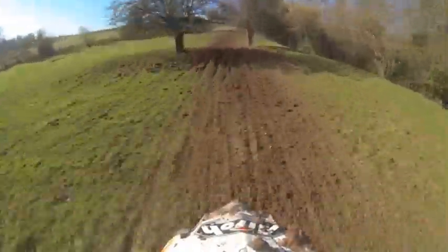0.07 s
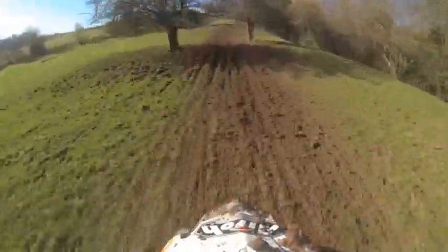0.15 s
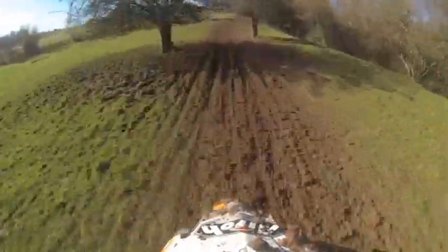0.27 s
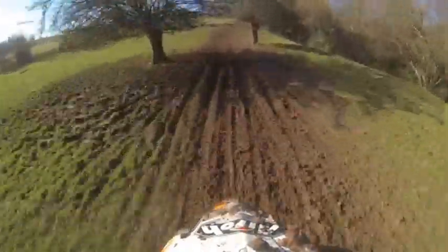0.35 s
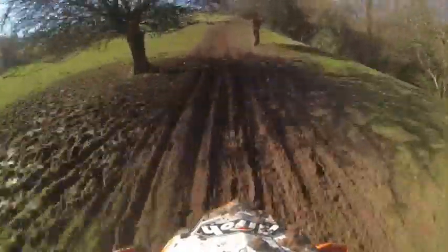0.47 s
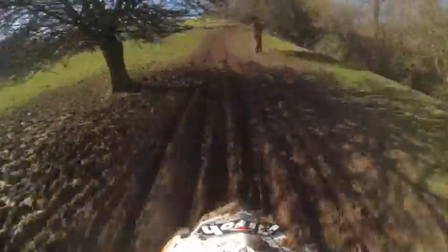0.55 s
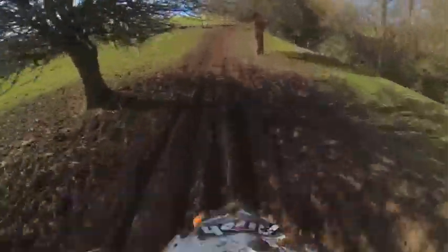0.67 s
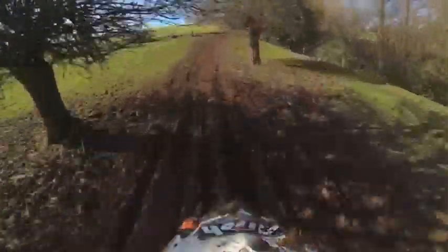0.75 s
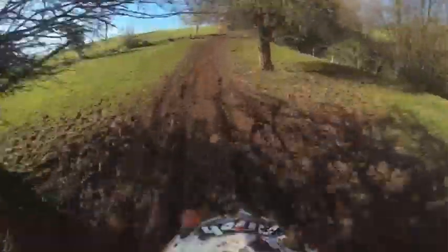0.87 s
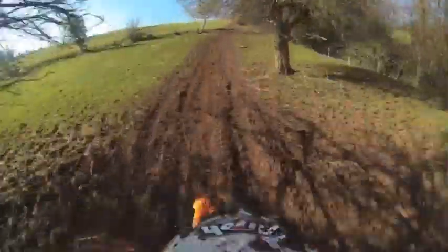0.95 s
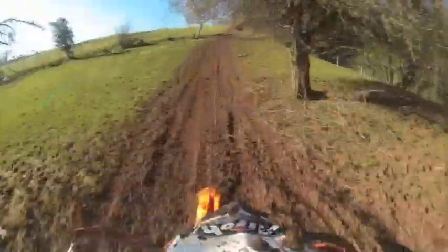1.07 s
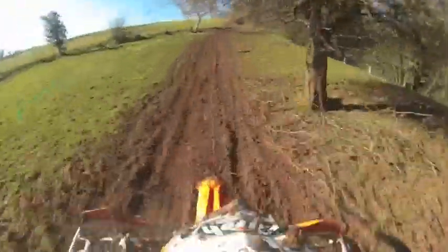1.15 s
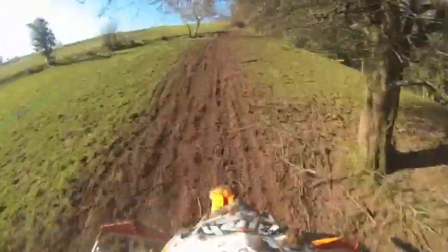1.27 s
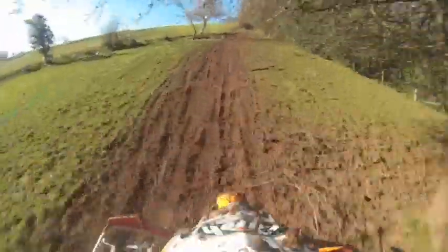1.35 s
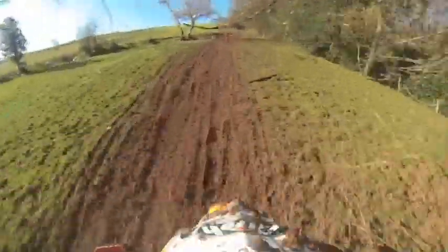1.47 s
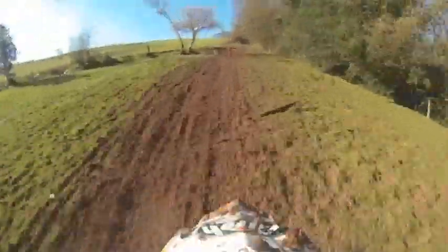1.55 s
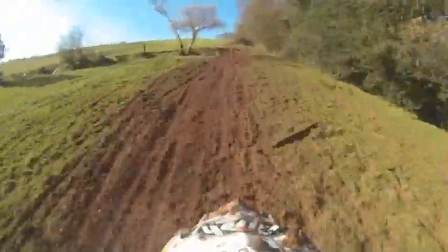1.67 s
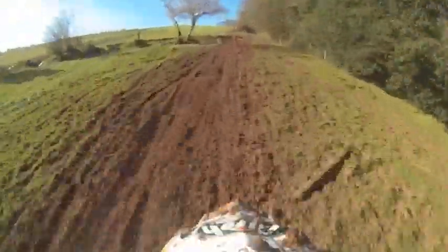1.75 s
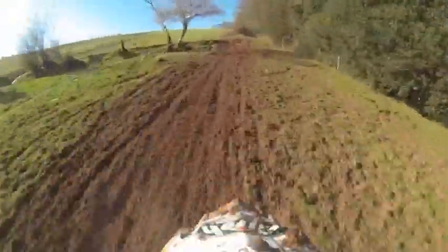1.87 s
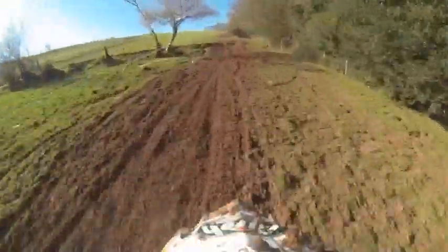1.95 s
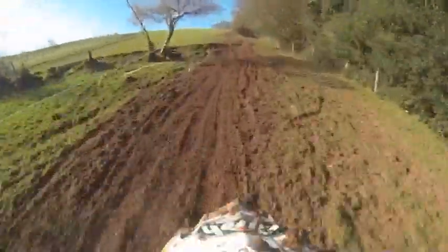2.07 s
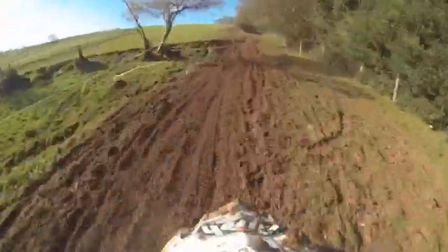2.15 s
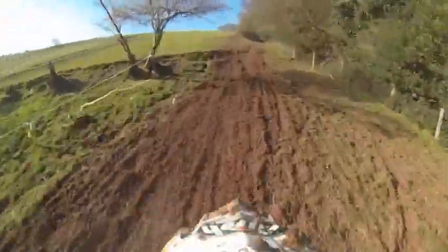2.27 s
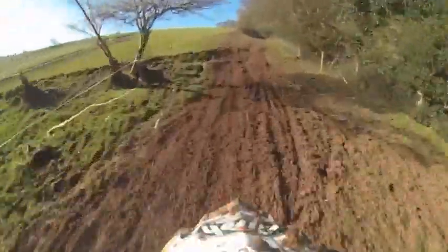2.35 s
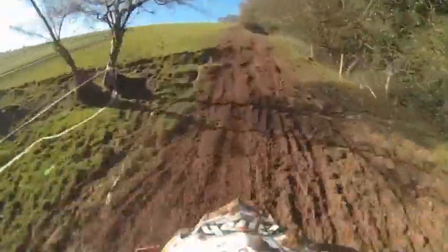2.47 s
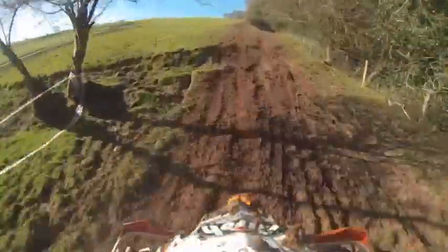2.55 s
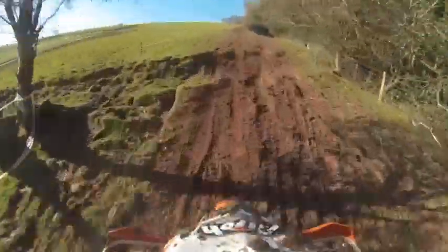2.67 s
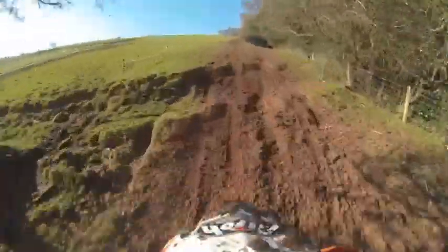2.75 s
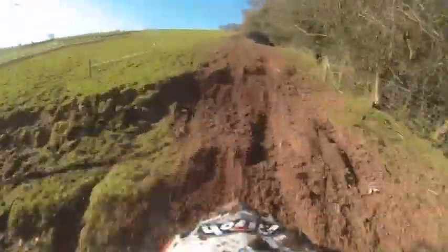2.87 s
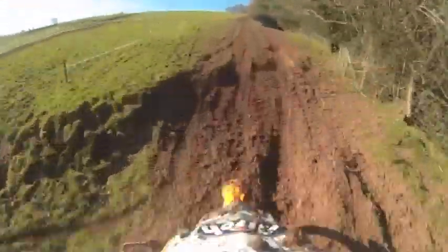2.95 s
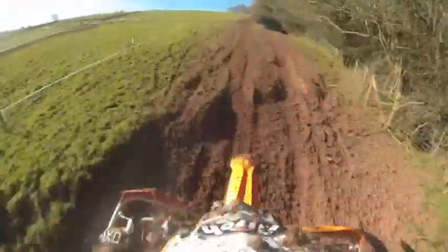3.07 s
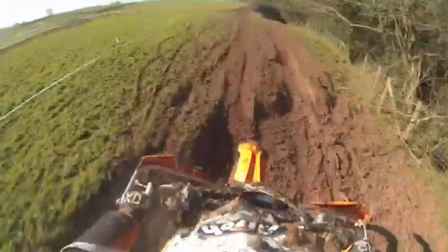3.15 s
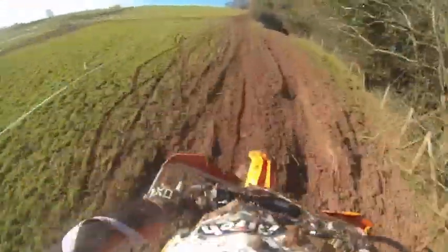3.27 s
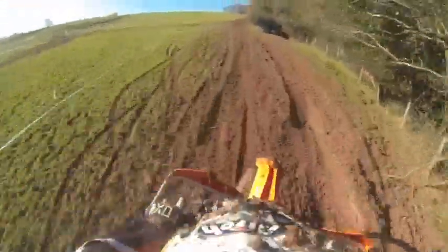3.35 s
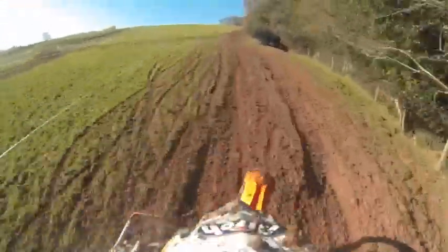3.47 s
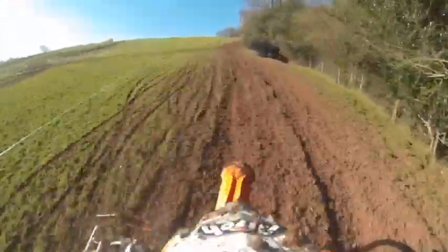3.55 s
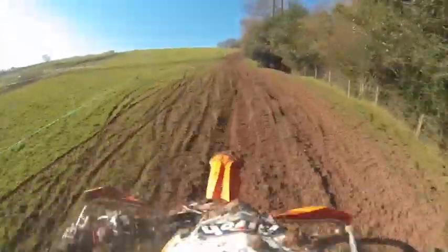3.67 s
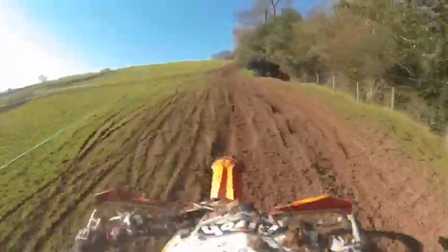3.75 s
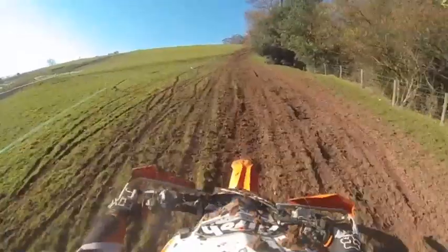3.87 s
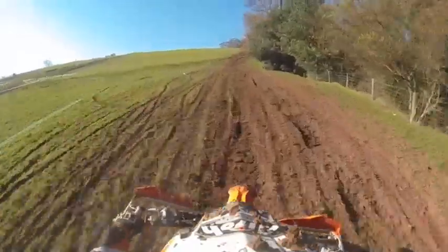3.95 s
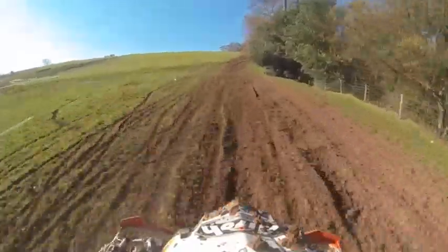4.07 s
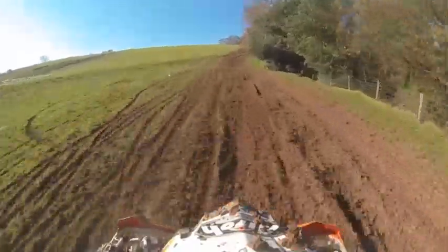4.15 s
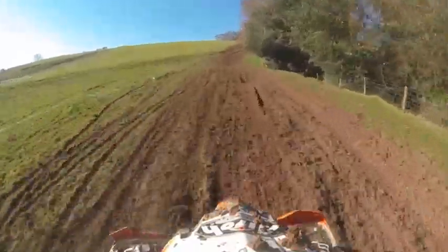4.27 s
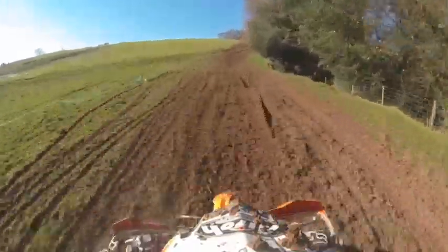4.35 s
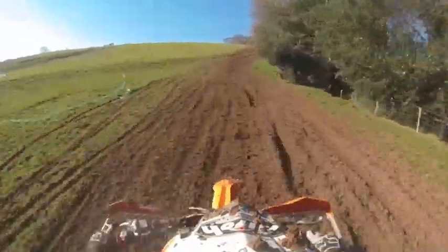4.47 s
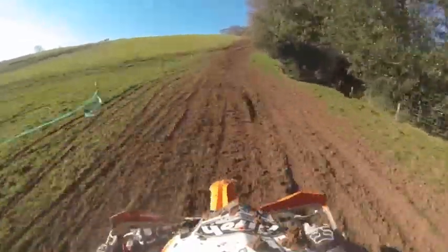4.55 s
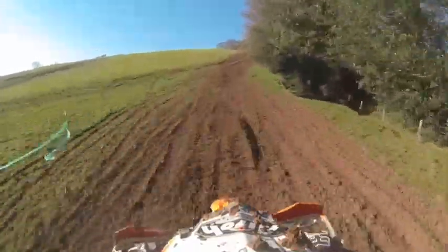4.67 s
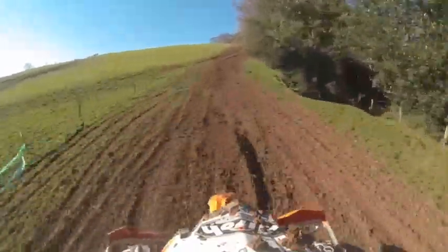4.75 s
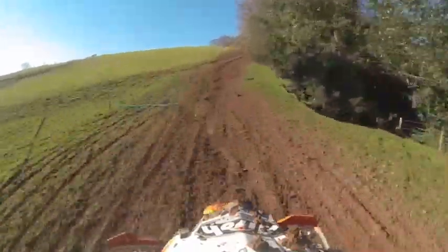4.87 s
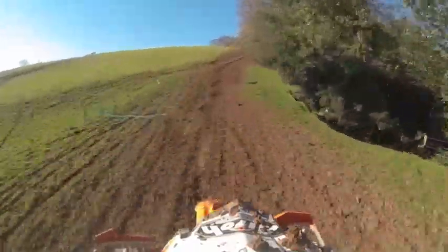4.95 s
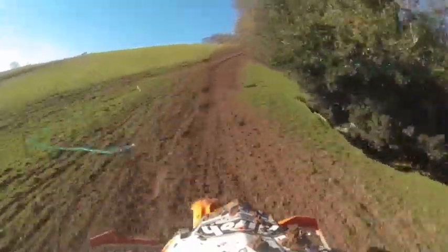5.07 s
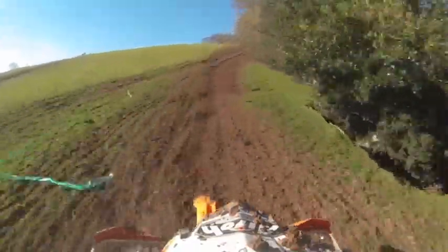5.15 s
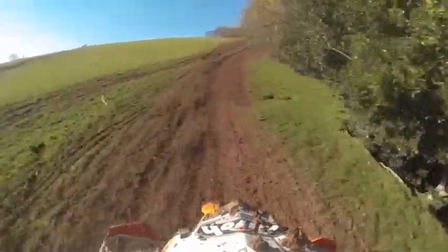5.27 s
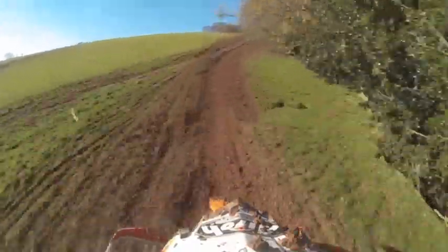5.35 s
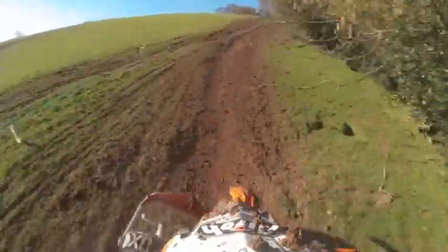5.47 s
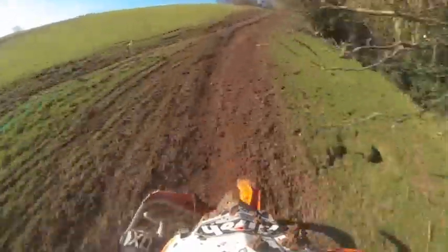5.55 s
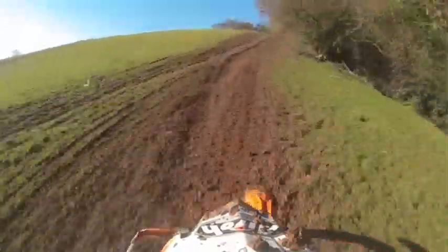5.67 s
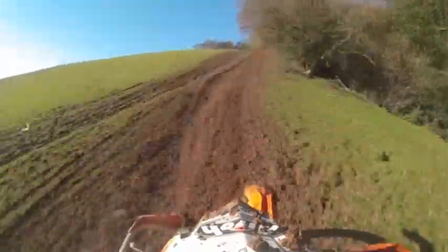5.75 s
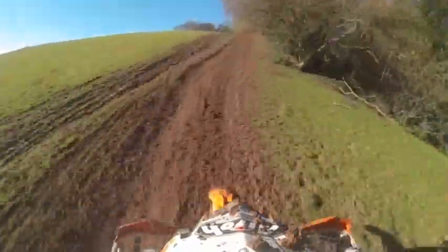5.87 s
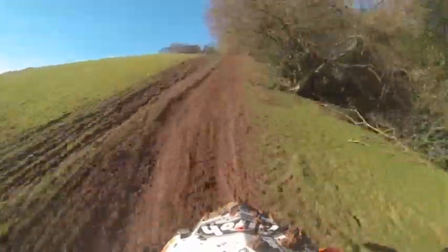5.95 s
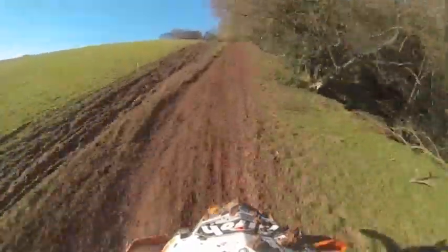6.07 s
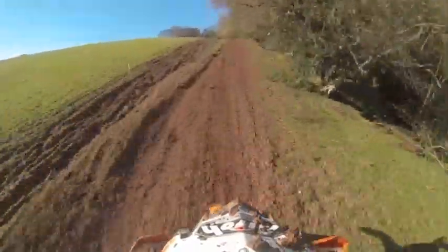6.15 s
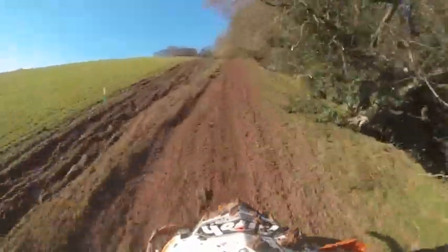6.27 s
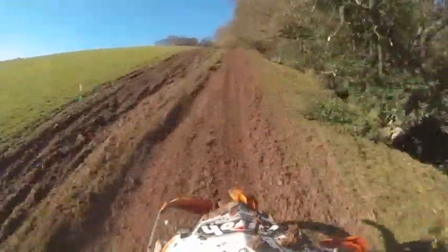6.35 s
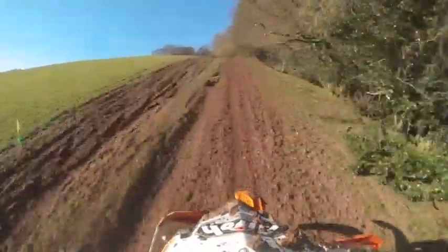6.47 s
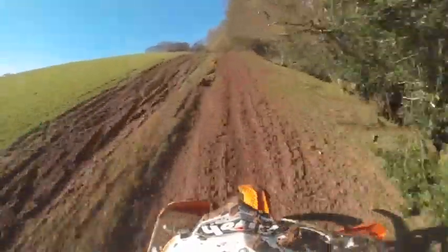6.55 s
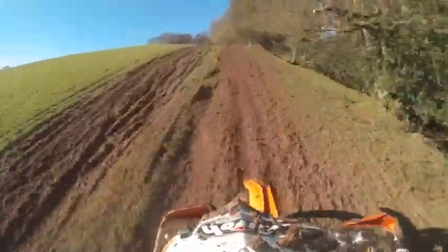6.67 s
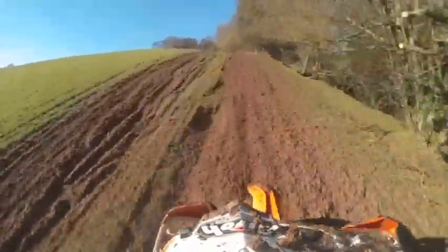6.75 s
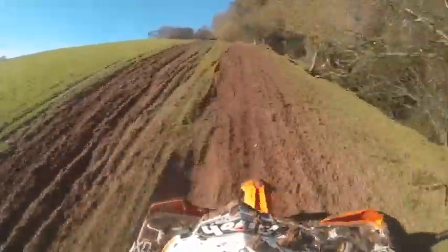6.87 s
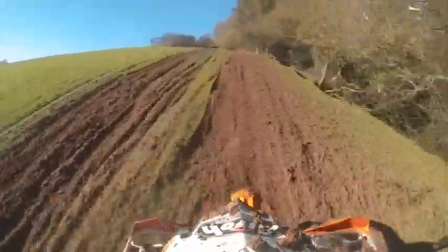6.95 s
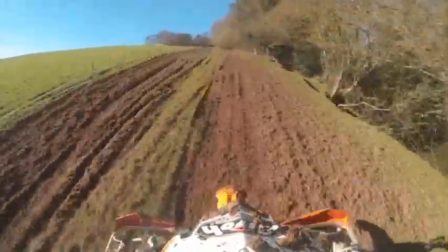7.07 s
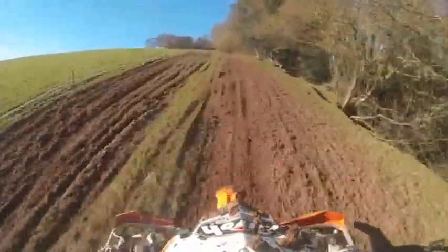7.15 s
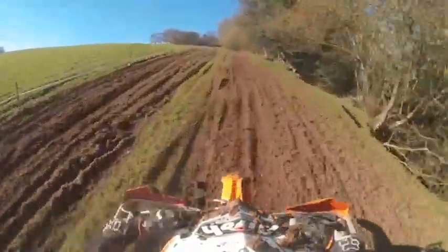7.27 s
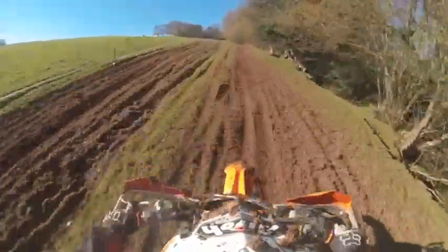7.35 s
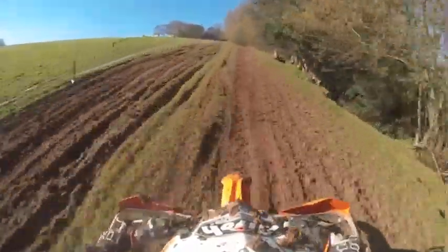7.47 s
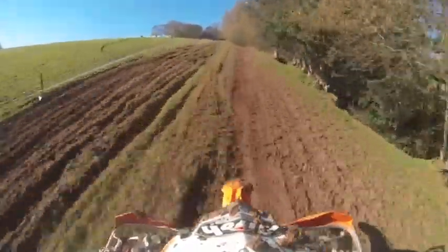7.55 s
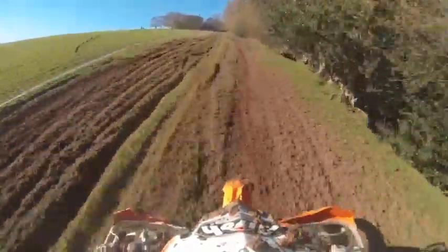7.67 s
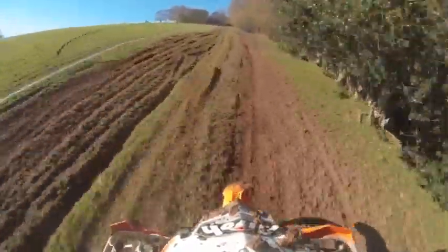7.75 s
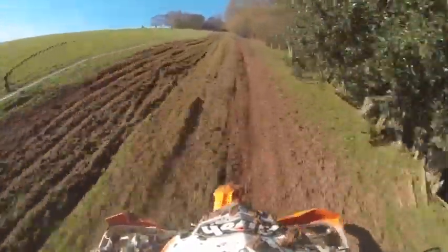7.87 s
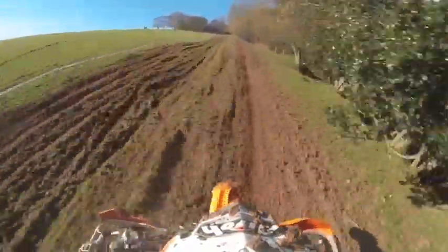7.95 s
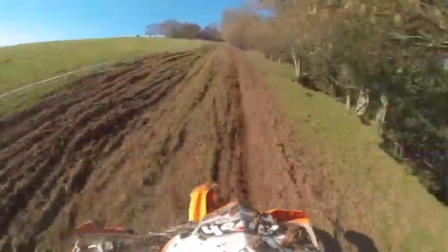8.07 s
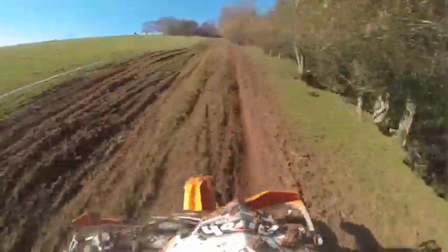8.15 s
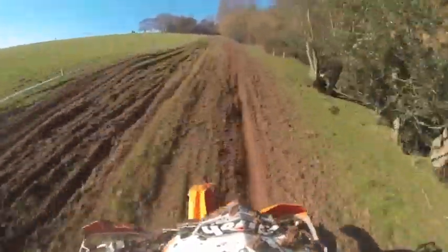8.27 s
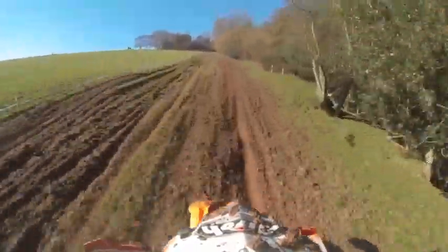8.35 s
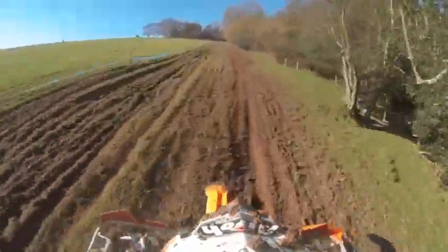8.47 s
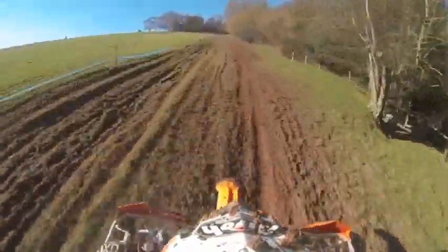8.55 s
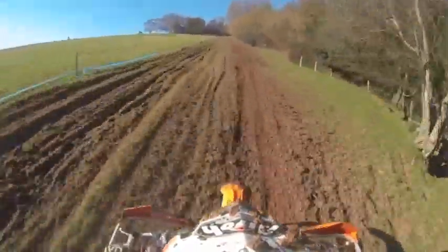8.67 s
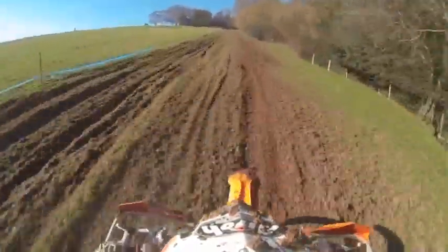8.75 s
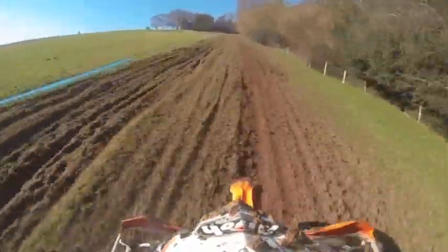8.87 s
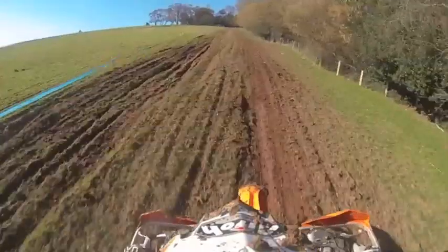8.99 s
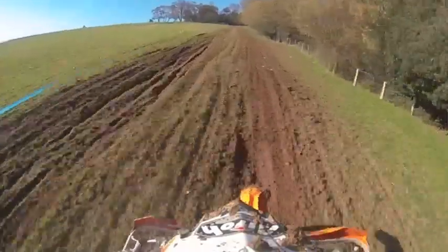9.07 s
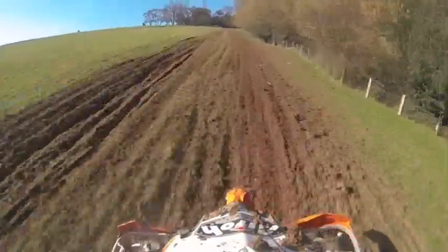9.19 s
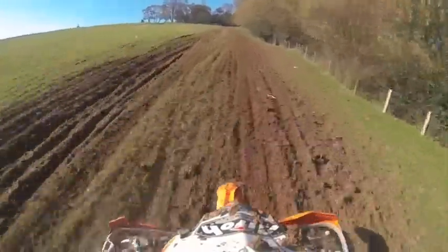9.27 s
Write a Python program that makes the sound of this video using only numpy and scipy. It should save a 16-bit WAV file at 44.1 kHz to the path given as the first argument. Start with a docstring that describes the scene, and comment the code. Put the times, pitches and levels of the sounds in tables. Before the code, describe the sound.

A single-cylinder four-stroke dirt bike is heard up close from the rider, outdoors on rough ground, with a low pulsing boom, a sharp bark and a gassy rasp. It starts on part throttle and opens up at about 0.6 seconds, the revs flaring as the wheel slips. At 1.55 seconds a sharp click on the microphone briefly ducks everything. The throttle shuts at about 2.1 and again at 2.5 seconds, exposing engine and chain clatter. The revs then shoot up at 2.9 seconds and higher still around 3.4, settling by 4. From there the engine pulls hard to the end at about 9.3 seconds, its pitch wavering with many quick flares. A lighter click comes at 5.7 seconds during a stronger surge. Low wind rumble runs throughout, with short buffets from bumps, strongest around 3.1 and 4.5 to 4.7 seconds.

```python
"""Single-cylinder four-stroke dirt bike ridden hard up a rutted field, heard from a camera on the rider.
Each firing drives a low pulse through the pipe, a sharp mid-band bark and a rasp of gas.
Wheel slip flares the revs; off the throttle the bark gives way to engine and chain clatter.
Wind and bumps rumble on the microphone. Two hard clicks on the camera duck its limiter."""
import sys
import numpy as np
from scipy import signal
from scipy.fft import rfft, irfft
from scipy.io import wavfile
from scipy.ndimage import uniform_filter1d, minimum_filter1d

SR = 44100
rng = np.random.default_rng(int(sys.argv[2]) if len(sys.argv) > 2 else 0)


def dump(signal):
    """Clip the signal to [-1, 1] and save it as 16-bit WAV at the path in sys.argv[1]."""
    limited = np.clip(np.atleast_2d(signal).T, -1, 1)
    pcm = np.round(limited * 32767).astype(np.int16)
    wavfile.write(sys.argv[1], SR, pcm)


N = 411012
T = np.arange(N) / SR
BIN_HZ = np.fft.rfftfreq(N, 1 / SR)

# firing rate with the rear wheel gripping (time [s], rate [Hz])
GRIP_RATE_HZ = [(0, 57), (0.477, 58.4), (0.57, 67), (1.027, 66.3), (2.038, 65.097), (2.22, 57.7),
                (2.595, 54.3), (2.769, 60.6), (3.123, 59.4), (3.755, 75.7), (4.038, 64.4), (4.397, 58.928),
                (5.792, 64.7), (6.569, 65.6), (6.928, 69.5), (7.493, 70.4), (9.32, 75)]
# rev flares from wheel slip (peak time [s], extra rate [Hz], length [s])
SLIP_FLARES = [(0.781, 7.214, 0.17), (1.088, 3.318, 0.161), (1.275, 12.665, 0.17), (1.496, 10.812, 0.472),
               (1.922, 7.103, 0.1), (2.086, 8.983, 0.132), (2.382, 4.661, 0.305), (2.862, 26.6, 0.39),
               (3.405, 41.4, 0.46), (3.586, 29.0, 0.3), (3.823, 3.211, 0.412), (4.332, 7.839, 0.113),
               (4.447, 9.736, 0.099), (4.583, 6.333, 0.113), (4.745, 8.231, 0.118), (4.92, 9.251, 0.126),
               (5.139, 7.614, 0.081), (5.382, 5.051, 0.299), (5.549, 17.224, 0.135), (5.696, 17.781, 0.259),
               (6.004, 9.99, 0.183), (6.206, 12.928, 0.289), (6.458, 1.71, 0.2464), (6.838, 3.31, 0.0816),
               (7.007, 3.286, 0.2), (7.177, 2.925, 0.1291), (7.601, 9.279, 0.097), (7.762, 14.398, 0.152),
               (7.977, 11.416, 0.107), (8.104, 12.929, 0.118), (8.244, 10.184, 0.114),
               (8.392, 8.579, 0.356), (8.593, 11.937, 0.111), (8.722, 11.97, 0.129), (8.912, 4.48, 0.086),
               (9.091, 11.111, 0.16), (9.261, 15.16, 0.223)]
# throttle (time [s], opening [0-1])
THROTTLE_OPENING = [(.15, 0.2), (.3, 0.42), (.53, 0.5), (.63, 0.84), (2.07, 0.91), (2.12, 0), (2.33, .48),
                    (2.44, 0.3), (2.55, 0), (2.68, 0.68), (2.87, 0.98), (3.08, 0.59), (3.22, 0.8),
                    (4.1, 0.84), (4.3, .6), (4.5, 0.77), (5.2, 0.79), (5.6, 0.99), (7, 0.97), (8.4, 0.81),
                    (9.32, 0.93)]
# pipe and silencer response (frequency [Hz], gain [dB])
PIPE_DB = [(45, -36), (68, -25), (105, -34), (135, -16.5), (185, -9), (220, -1), (268, 10), (315, -2),
           (372, -16), (412, -18.5), (445, -11), (478, -11.5), (530, -12), (578, -23.5), (625, -15.5),
           (690, -27), (760, -24.5), (900, -30.5), (1050, -28), (1400, -51.5), (4000, -100)]
# main pipe resonance (time [s], sharpness [0-1])
PIPE_SHARPNESS = [(0, .2), (.5, 0), (.65, 0.4), (1.5, 0.3), (1.8, 0.7), (2.08, 0.5), (2.2, 0.85), (2.7, 0),
                  (2.86, 0.59), (3.05, 0.2), (3.6, .12), (3.85, .95), (5.3, 0.96), (6.5, 0.6), (7.4, .95),
                  (9.3, 1)]
# firing crack spectrum (frequency [Hz], gain [dB])
CRACK_DB = [(300, -56.5), (900, -35.5), (1150, -12), (1340, -12), (1480, 6.5), (1680, 3.5), (1870, 2),
            (2080, -12), (2300, -30.5), (2850, -26), (3250, -24.5), (3800, -34), (4500, -51), (9000, -100)]
# hollow band rung by the gas rush (frequency [Hz], gain [dB])
RUSH_DB = [(300, -46.5), (600, -24), (880, -25), (1100, -17.5), (1300, -8), (1500, -1.5), (1650, 3.5),
           (1870, -5.5), (2080, -15), (2500, -29.5), (4000, -77), (8000, -100)]
# slow swell of the bark (time [s], gain [dB])
BARK_SWELL_DB = [(0, 3.5), (.3, 1.5), (.65, 5.5), (.93, -0.5), (1.2, 1.5), (1.52, 3.5), (2.2, 0),
                 (2.55, 1.5), (2.77, 2.5), (3.1, 0.5), (3.55, 0), (3.7, 2), (4.2, 2), (4.7, -.5),
                 (5.1, 0.5), (5.45, -2), (6.5, -2.5), (7, 0.5), (7.4, -1), (8, 1.5), (8.55, -2.5), (9.1, 1)]
# engine case and chain spectrum (frequency [Hz], gain [dB])
CLATTER_DB = [(120, -27.5), (250, -15.5), (430, -11), (600, -19.5), (800, -19.5), (1050, -14), (1280, -3),
              (1520, 2), (1750, -3), (2050, -16), (2600, -17.5), (4000, -68.5), (8000, -100)]
# gas flow spectrum (frequency [Hz], gain [dB])
RASP_DB = [(1200, -22.5), (2150, -1), (2650, 0.5), (2900, -2), (3250, 1), (3600, -3.5), (3950, -5),
           (4450, -15), (5000, -19), (5600, -25), (6400, -33), (7100, -36.5), (8500, -43.5), (10500, -52.5),
           (15000, -75.5)]
# running gear resonances (centre [Hz], width [Hz], relative level [dB])
GEAR_RINGS = [(4980, 460, -15), (6480, 300, -27), (12900, 110, -40)]
# rumble on the microphone (time [s], wind [dB], ground [dB])
RUMBLE_DB = [(0, -29, -27.5), (.55, -36, -23), (.75, -34, -34.5), (1.5, -29.5, -31.5), (2.2, -26.5, -29),
             (3.1, -25.5, -31.5), (3.4, -34, -31), (4.1, -31, -42), (4.6, -36.5, -31), (5.6, -27, -34),
             (6.7, -36, -33), (8, -35, -37.5), (9.3, -39.5, -36)]
# air buffets at bumps (time [s], peak [dB])
BUMP_BUFFETS = [(3.06, -17), (3.113, -13), (3.719, -14), (4.45, -17), (4.515, -9), (4.668, -10),
                (4.846, -16), (5.225, -16.5), (6.335, -16), (6.759, -18.5), (7.45, -23), (7.725, -18),
                (7.942, -23), (8.079, -21), (8.195, -15), (8.689, -17.5), (8.85, -17)]
# knocks on the camera, pre-limiter (time [s], buzz [dB], length [s], nominal ring [Hz], thump [dB])
CAMERA_CLICKS = [(1.551, 34, 0.00957, 3141, 25.5), (5.705, 10.5, 0.0046, 2150, 0.5)]

# voice levels (wide open [dB], loss when shut [dB], gain in a full flare [dB])
BOOM_LAW_DB, GROWL_LAW_DB = (-16.5, 27.2, 2.7), (-33.5, 12, 4.8)
BARK_LAW_DB, RASP_LAW_DB = (-18, 8.25, 0.49), (-29.5, 6.8, .2)


def engine(full_flare_hz=17, bark_lag_s=0.001018, rasp_lag_s=0.00061):
    """Throttle and wheel slip drive all engine voices from one firing rate."""
    throttle, flare_hz = curves(THROTTLE_OPENING)[0], wheel_slip()
    rate_hz = curves(GRIP_RATE_HZ)[0] + flare_hz
    damping = 1 - np.clip(curves(PIPE_SHARPNESS)[0], 0, 1)
    load = engine_load(throttle, rate_hz, damping)
    boom_db, growl_db, bark_db, rasp_db = (
        open_db - shut_db * (1 - throttle) + slip_db * np.tanh(flare_hz / full_flare_hz)
        for open_db, shut_db, slip_db in (BOOM_LAW_DB, GROWL_LAW_DB, BARK_LAW_DB, RASP_LAW_DB))
    times_s, sizes = firings(rate_hz, load)
    out = exhaust(times_s, sizes, rate_hz, damping, boom_db, growl_db)
    out += snarl(rate_hz, damping, growl_db)
    out += amp(bark_db + curves(BARK_SWELL_DB)[0]) * bark(times_s + bark_lag_s, sizes, load)
    return out + amp(rasp_db) * rasp(times_s + rasp_lag_s, sizes, rate_hz, load)


def wheel_slip(rise_share=.55):
    """Extra firing rate [Hz] while the rear wheel spins, smoothed by the flywheel."""
    flares_hz = np.zeros(N)
    for peak_s, extra_hz, length_s in SLIP_FLARES:
        corners_s = [peak_s - rise_share * length_s, peak_s, peak_s + (1 - rise_share) * length_s]
        flares_hz += np.interp(T, corners_s, [0, extra_hz, 0])
    return uniform_filter1d(flares_hz, size=1100)


def engine_load(throttle, rate_hz, damping, pull_from=.48, pull_span=.11, lug_hz=52, loss_per_hz=0.011):
    """Share of the upper sound that pulses with the firings; highest pulling at low revs."""
    pulling = np.clip((throttle - pull_from) / pull_span, 0, 1)
    crispness = 1 - 0.61 * damping
    lugging = 1 - loss_per_hz * np.maximum(rate_hz - lug_hz, 0)
    return np.clip(0.92 * pulling * crispness * lugging, 0, .97)


def firings(rate_hz, load, half_load_jitter_s=.00004, half_load_spread_db=1.1):
    """Power stroke times and strengths; light load burns less evenly."""
    cycles = np.cumsum(rate_hz) / SR
    timing, strength = rng.standard_normal((900, 2))[:int(cycles[-1])].T
    times_s = np.interp(np.arange(len(timing)) + .5, cycles, T)
    uneven = 1.5 - np.interp(times_s, T, load)
    return times_s + half_load_jitter_s * uneven * timing, amp(half_load_spread_db * uneven * strength)


def exhaust(times_s, sizes, rate_hz, damping, boom_db, growl_db, resonance_hz=265, flutter_db=-23.5):
    """Firing pulses in the pipe: deep thud, boom of the main resonance, growl of upper orders."""
    pipe = colour(steady(pulses(times_s, sizes)) + amp(flutter_db) * noise(), PIPE_DB)
    resonance = signal.lfilter(*signal.iirpeak(resonance_hz, Q=3, fs=SR), pipe)
    spectrum = rfft(pipe - 0.76 * damping * resonance)
    above_thud, above_boom = (1 - 1 / (1 + (BIN_HZ / split_hz) ** 24) for split_hz in (172, 365))
    bands = (1 - above_thud, above_thud - above_boom, above_boom)
    thud, boom, growl = (steady(irfft(spectrum * band, N)) for band in bands)
    thud_db = 0.4 * boom_db + 0.65 * growl_db - 4.5 + 7.5 * damping
    thud_db -= np.interp(rate_hz, [86, 100], [0, 10])  # second order leaves the band at top revs
    return amp(thud_db) * thud + amp(boom_db) * boom + amp(growl_db - 3 * damping) * growl


def snarl(rate_hz, damping, growl_db, order=6, waver_db=2, silencer_hz=534, loss_db_per_hz=.055):
    """One wavering firing order, exposed when the pipe is damped; the silencer cuts it at high revs."""
    waver = unit(uniform_filter1d(uniform_filter1d(noise(), size=700), size=700))
    loss_db = np.clip(loss_db_per_hz * (order * rate_hz - silencer_hz), 0, 20)
    tone = unit(np.sin(2 * np.pi * order * np.cumsum(rate_hz) / SR))
    return damping * amp(growl_db + 0.9 + waver_db * waver - loss_db) * tone


def bark(times_s, sizes, load, scatter_s=.00007, echo_s=0.0052, echo_db=-16.5, crack_share=.73):
    """Mid-band crack and gas rush per firing; clatter takes over as load falls."""
    times_s = times_s + scatter_s * rng.standard_normal(900)[:len(times_s)]  # burn peaks vary in angle
    crack = colour(pulses(times_s, sizes) + amp(echo_db) * pulses(times_s + echo_s, sizes), CRACK_DB)
    puffs = gas_puffs(times_s, sizes, rise_s=0.00055, surges_s=(.0018, .0062), surges_db=(2, 2))
    rush = colour(puffs, RUSH_DB)
    fired = np.sqrt(crack_share) * steady(crack) + np.sqrt(1 - crack_share) * steady(rush)
    clatter = unit(colour(rattle(rate_hz=900, spread_db=4, wash_db=3.5), CLATTER_DB))
    return np.sqrt(load) * fired + np.sqrt(1 - load) * clatter


def rasp(times_s, sizes, rate_hz, load):
    """Gas hiss chopped by the firings, over fizz and thin rings of the running gear."""
    puffs = gas_puffs(times_s, sizes, rise_s=.0007, surges_s=(0.0017, 0.0058), surges_db=(-1, -4.5))
    fizz = rattle(rate_hz=1200, spread_db=-1, wash_db=7)
    puff_share = np.clip(1.03 * load, 0, .93)
    hiss = colour(np.sqrt(puff_share) * steady(puffs) + np.sqrt(1 - puff_share) * fizz, RASP_DB)
    rings = sum(amp(db) * gear_ring(hz, width_hz) for hz, width_hz, db in GEAR_RINGS)
    coasting = (1.15 - load) * (60 / rate_hz) ** 2
    return unit(hiss) + rings * coasting


def gas_puffs(times_s, sizes, rise_s, surges_s, surges_db):
    """Gas noise: one blast per firing, then delayed surges."""
    t = np.arange(1200) / SR
    blast = (t / rise_s) ** 2 * np.exp(-2 * t / rise_s)
    power = pulses(times_s, sizes ** 2)
    for delay_s, db in zip(surges_s, surges_db):
        power += pulses(times_s + delay_s, (sizes * amp(db)) ** 2)
    return noise() * np.sqrt(abs(signal.oaconvolve(power, blast)[:N]))


def rattle(rate_hz, spread_db, wash_db):
    """Dense impacts of valves, chain and thrown dirt over an even wash."""
    hits = (rng.random(N) < rate_hz / SR) * noise()
    hits *= amp(spread_db * np.minimum(rng.exponential(1, N), 3))
    return unit(unit(hits) + amp(wash_db) * noise())


def gear_ring(centre_hz, width_hz):
    """Noise in one narrow metal resonance."""
    response = 1 / (1 + (2 * (BIN_HZ - centre_hz) / width_hz) ** 2) ** 2
    return unit(irfft(rfft(noise()) * response, N))


def wind(full_scale_half_s=0.004):
    """Turbulence and ground rumble; each bump sucks, then pushes air at the microphone."""
    wind_db, ground_db = curves(RUMBLE_DB)
    air = colour(noise(), [(8, -6), (22, 8), (40, -3), (80, -17), (200, -42), (800, -94.5)])
    ground = colour(noise(), [(25, -13.5), (60, -7), (90, -0.5), (125, -8), (200, -15.5),
                              (400, -24.5), (2500, -100)])
    out = amp(wind_db) * unit(air) + amp(ground_db) * unit(ground)
    for time_s, peak_db in BUMP_BUFFETS:
        half_s = full_scale_half_s / amp(peak_db) ** 0.34  # weaker buffets last longer
        u = np.clip((T - time_s) / half_s, -10, 10)
        out += amp(peak_db) * u * np.exp((1 - u ** 2) / 2)
    return out


def camera_clicks(grit_db=4.5, thump_hz=81.3, thump_t60_s=0.11, thump_lag_s=0.013):
    """Knocks buzz the case with falling pitch; a low thump follows each click."""
    out, t = np.zeros(N), np.arange(SR // 4) / SR
    for time_s, buzz_db, length_s, ring_hz, thump_db in CAMERA_CLICKS:
        progress = np.minimum(t / length_s, 1)
        buzz_hz = ring_hz * (1.15 - 0.47 * progress ** 2)
        buzz = np.sin(2 * np.pi * np.cumsum(buzz_hz) / SR)
        grit = colour(noise(), [(300, -22.5), (1000, 1.5), (2200, 10), (4000, -5),
                                (9000, -35), (15000, -42)])
        grit = amp(grit_db) * unit(grit)[SR:SR + len(t)]
        thump = amp(thump_db - 60 * t / thump_t60_s) * np.sin(2 * np.pi * thump_hz * t)
        add(out, time_s, amp(buzz_db) * np.sin(np.pi * progress) ** 2 * (buzz + grit))
        add(out, time_s + thump_lag_s, thump)
    return out


def limiter(x, limit_db=-6.5, cut_share=0.79, quick_db_per_s=130, slow_db_per_s=11):
    """Look-ahead ducking; deep cuts release quickly, the last few dB slowly."""
    power_db = 10 * np.log10(abs(uniform_filter1d(x ** 2, size=130)) + 1e-12)
    peak_db = -minimum_filter1d(-power_db, size=440)
    cut_db = cut_share * np.maximum(peak_db - limit_db, 0)
    lasting_db = np.minimum(cut_db, 8.5 + 0.14 * cut_db)
    quick_db, slow_db = (np.maximum.accumulate(db + db_per_s * T, axis=-1) - db_per_s * T
                         for db, db_per_s in ((cut_db, quick_db_per_s), (lasting_db, slow_db_per_s)))
    return x * amp(-uniform_filter1d(np.maximum(quick_db, slow_db), size=320))


def amp(db):
    """dB to gain."""
    return 10 ** (np.asarray(db) / 20)


def unit(x):
    """Scale to rms 1."""
    return x / np.sqrt(np.mean(x ** 2) + 1e-20)


def steady(x):
    """Hold the slow level at rms 1; single firings survive."""
    power = uniform_filter1d(uniform_filter1d(x ** 2, size=2600), size=2600)
    return x / np.sqrt(abs(power) + 1e-14)


def noise():
    """White noise, rms 1."""
    return rng.standard_normal(N)


def curves(rows):
    """Per-sample curve for each value column of a time table."""
    times_s, *columns = np.transpose(rows)
    return [np.interp(T, np.sort(times_s), column) for column in columns]


def colour(x, points):
    """Minimum-phase filter from points (frequency [Hz], gain [dB])."""
    hz, db = np.transpose(points)
    grid_hz = abs(np.fft.fftfreq(8192, 1 / SR))
    log_gain = np.log(amp(np.interp(np.log(grid_hz + 1), np.log(hz), db)))
    taps = np.fft.ifft(np.exp(np.conj(signal.hilbert(log_gain)))).real[:4096]
    return signal.oaconvolve(x, taps)[:N]


def pulses(times_s, sizes):
    """Impulses, each split between adjacent samples."""
    position = np.clip(times_s * SR, 0, N - 2)
    index = position.astype(int)
    fraction = position - index
    return np.bincount(index, sizes * (1 - fraction), N) + np.bincount(index + 1, sizes * fraction, N)


def add(mix, time_s, sound):
    """Mix a sound in at time_s."""
    part = mix[max(round(time_s * SR), 0):][:len(sound)]
    part += sound[:len(part)]


def scene():
    """Engine, wind and clicks, mono."""
    return (engine() + wind() + camera_clicks())[None]


def record(dry, rolloff_hz=9000, band_limit_hz=15600):
    """Limiter, 2x oversampled saturation, treble roll-off, band limit."""
    limited = limiter(dry) * signal.windows.tukey(N, .0006)
    oversampled = signal.resample_poly(limited, 2, 1, axis=1, window=("kaiser", 10))
    saturated = signal.resample_poly(oversampled / (1 + oversampled ** 10) ** (1 / 10), 1, 2, axis=1)
    dull = signal.lfilter(*signal.butter(1, rolloff_hz, fs=SR), saturated)
    taps = signal.firwin(255, band_limit_hz, window=("kaiser", 9), fs=SR)
    return signal.oaconvolve(dull, taps[None], "same")


dry = scene()
out = record(dry)
dump(out)
```